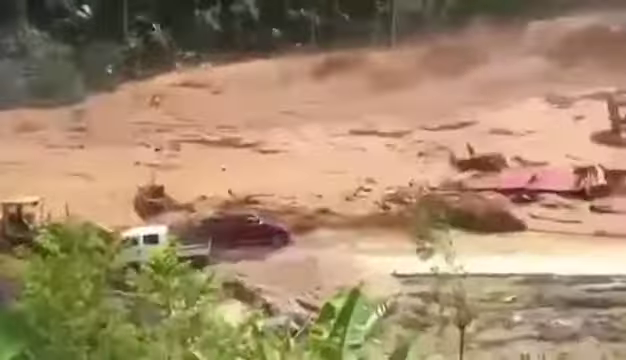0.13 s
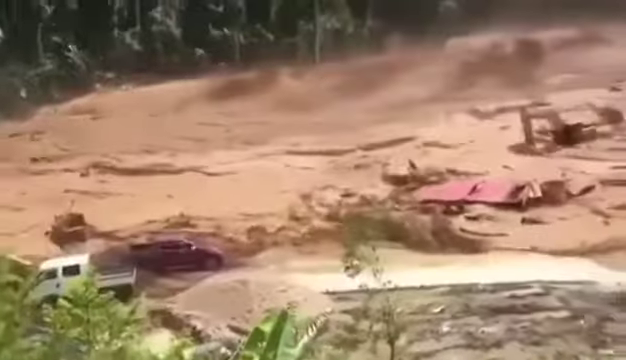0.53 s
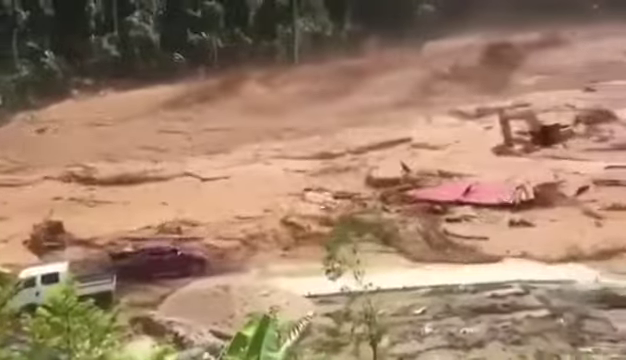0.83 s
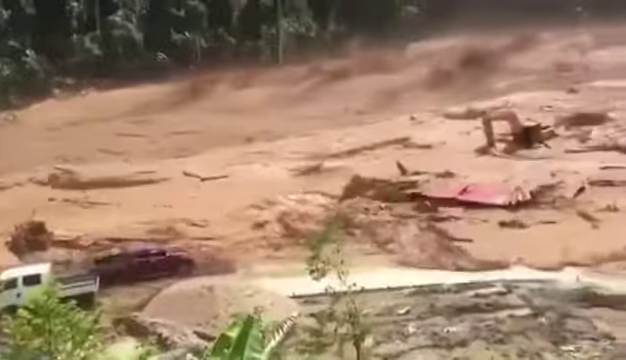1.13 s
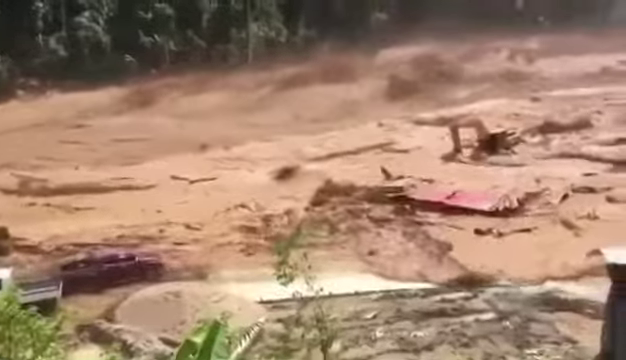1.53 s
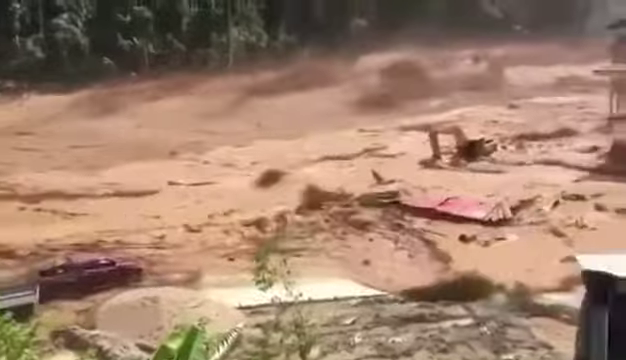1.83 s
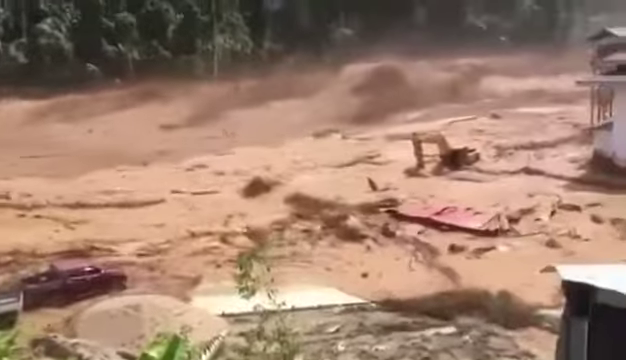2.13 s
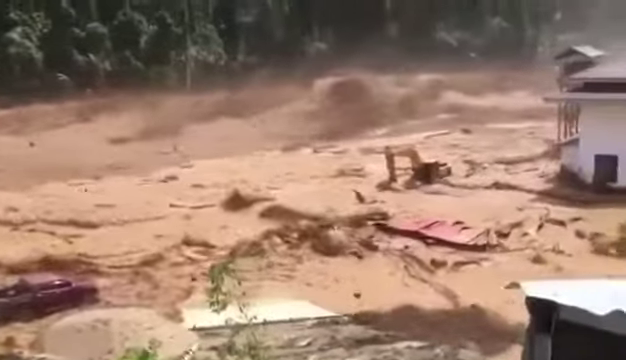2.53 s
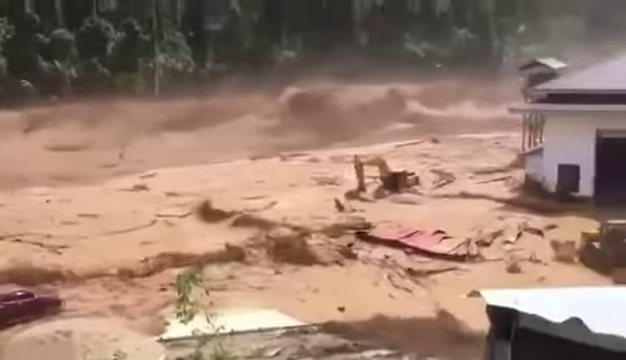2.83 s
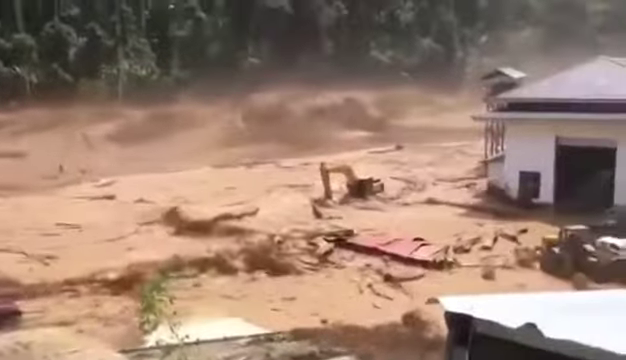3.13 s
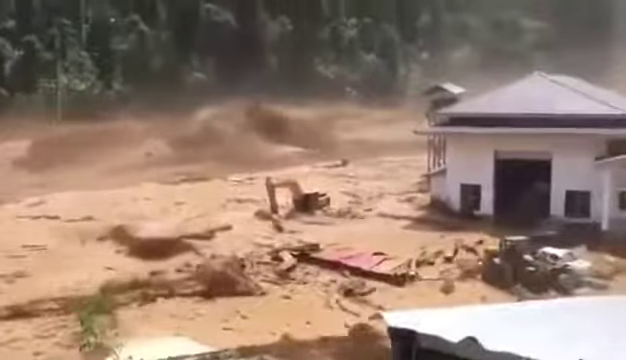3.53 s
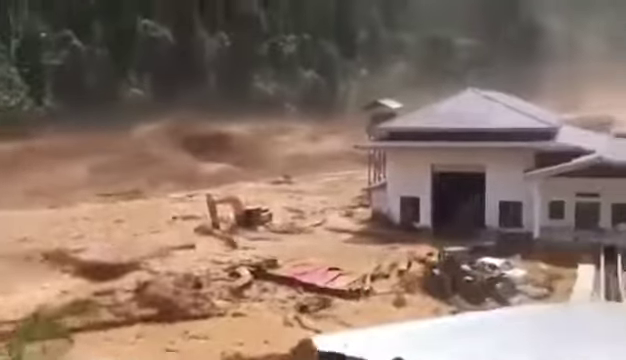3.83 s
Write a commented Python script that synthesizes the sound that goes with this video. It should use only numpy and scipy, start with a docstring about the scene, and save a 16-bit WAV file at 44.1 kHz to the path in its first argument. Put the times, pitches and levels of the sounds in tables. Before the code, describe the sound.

Floodwater rushes outdoors, soft at first, then a full continuous roar with deep rumble, bubbling and sharp splashes. High insect-like whistles pulse only at the start. The microphone overlooks it, with limited treble and slight overload on peaks.

```python
"""In a valley, heard from a slope above, a flood of mud and water roars; the sound fades in.
Rumble, roar, spray and fizz are bands of random noise, each with its own spectrum and level curve.
Heavy thuds are short low tones, breaking waves are short noise bursts, bubbles are brief rising tones.
Two thin, pulsing whistles, perhaps insects, are tones blended with narrow noise; they stop within a second.
"""
import sys
import numpy as np
from scipy import signal
from scipy.fft import rfft, irfft
from scipy.io import wavfile

SR = 44100
rng = np.random.default_rng(int(sys.argv[2]) if len(sys.argv) > 2 else 0)


def master_out(mix):
    """Clip the mix to full scale and print it as 16-bit PCM to the path in sys.argv[1]."""
    frames = np.transpose(np.atleast_2d(mix))
    ceiling = np.clip(frames, -1, 1)
    pcm = np.round(ceiling * 32767).astype(np.int16)
    wavfile.write(sys.argv[1], SR, pcm)


N = 175518
TIME = np.arange(N) / SR  # s


def amp(db):
    """Decibel definition: 20 dB is a factor of ten in amplitude."""
    return 10 ** (np.asarray(db) / 20)


def evened(x):
    """Normalisation to unit root-mean-square value."""
    return x / np.sqrt(np.mean(x ** 2) + 1e-20)


def bell(t, centre, width):
    """Gaussian pulse: falls to 1/e at one width from its centre."""
    return np.exp(-((t - centre) / width) ** 2)


def spectrum_db(points, hz):
    """Spectral density: interpolated on a logarithmic frequency axis, -100 dB outside the points."""
    f, db = np.transpose(points)
    return np.interp(np.log(hz + 1), np.log(f + 1), db, left=-100, right=-100)


def noise(shape_db, size, patch_db, patch_hz, patch_s):
    """Short-time Fourier synthesis: random spectra under shape_db(hz, t), with drifting patches."""
    hop = size // 4
    hz = np.fft.rfftfreq(size, 1 / SR)[:, None]
    t = np.arange(N // hop + 5) * hop / SR
    real, imaginary, grain = rng.standard_normal((3, len(hz), len(t)))
    # Gaussian smoothing makes neighbouring frequencies and moments rise and fall together
    steps = np.arange(-40, 41)
    across_hz = np.exp(-.5 * (steps / (patch_hz * size / SR)) ** 2)
    across_time = np.exp(-.5 * (steps / (patch_s * SR / hop)) ** 2)
    patches = evened(signal.fftconvolve(grain, np.outer(across_hz, across_time), "same"))
    spectra = (real + 1j * imaginary) * amp(shape_db(hz, t) + patch_db * patches)
    return signal.istft(spectra, nperseg=size, noverlap=size - hop)[1][:N]


def coloured_noise(colour, patch_db, patch_hz, patch_s):
    """Stationary spectrum: patchy noise whose average colour stays the same, at unit rms."""
    return evened(noise(lambda hz, t: spectrum_db(colour, hz), 2048, patch_db, patch_hz, patch_s))


# Changing strength of the flood:
# (time [s], rumble level [dB], roar level [dB], spray level [dB])
FLOOD_LEVELS = [(0, -27.5, -33.5, -35), (.17, -29, -33, -34.5), (.4, -23, -28.5, -29),
                (.55, -22.5, -26, -25.5), (.7, -20, -24, -23.5), (.9, -16.5, -21.5, -25),
                (1.15, -18.5, -19.5, -20.5), (1.35, -19, -23, -23), (1.56, -20.5, -21, -22.5),
                (1.7, -17, -22.5, -22), (1.95, -19, -20, -21), (2.2, -18.5, -21.5, -21.5),
                (2.42, -18, -22.5, -21.5), (2.65, -16, -23, -22), (2.87, -19, -22, -22.5),
                (3.1, -19, -21.5, -22.5), (3.3, -17, -21, -23.5), (3.45, -23, -21, -22),
                (3.62, -16, -22, -24), (3.8, -19.5, -20, -24.5), (3.98, -18, -23.5, -22.5)]


def flood_db(column):
    """Level envelope: linear interpolation in decibels of one column of the flood's strength."""
    rows = np.array(FLOOD_LEVELS)
    return np.interp(TIME, rows[:, 0], rows[:, column])


# Colour of the rumble: (frequency [Hz], relative density [dB per Hz])
RUMBLE_COLOUR = [(15, -42), (28, -20), (40, -5), (52, -3), (72, -5.5), (85, -2.5), (115, -1.5), (190, -6),
                 (231, -4), (302, -9), (420, -20), (550, -32.5), (920, -100)]


def rumble():
    """Low-frequency band noise: the deep part of the flood under its own envelope."""
    return amp(flood_db(1)) * coloured_noise(RUMBLE_COLOUR, patch_db=1.35, patch_hz=40.4, patch_s=0.038)


# Colour of the roar: (frequency [Hz], relative density [dB per Hz])
ROAR_COLOUR = [(180, -24), (300, -5.5), (380, -1), (481, -2.5), (629, 1.5), (775, -0.5), (1000, 0),
               (1190, -7), (1500, -5.5), (1950, -16.5), (3300, -120)]


def roar():
    """Broadband noise: the middle of the spectrum under its own envelope."""
    return amp(flood_db(2)) * coloured_noise(ROAR_COLOUR, patch_db=2.5, patch_hz=26, patch_s=0.021)


# Colour of the spray: (frequency [Hz], relative density [dB per Hz])
SPRAY_COLOUR = [(710, -18), (1200, -3.5), (1890, -1), (2400, -1), (3110, -3), (3500, -5.5), (4200, -9),
                (6000, -59)]


def spray():
    """High-frequency band noise: the hiss of spray under its own envelope."""
    return amp(flood_db(3)) * coloured_noise(SPRAY_COLOUR, patch_db=3.0, patch_hz=26.4, patch_s=0.024)


# Strength of the fizz before its flicker: (time [s], level [dB])
FIZZ_LEVELS = [(0, -44.5), (.15, -42), (.4, -37), (.6, -33), (.9, -29.5), (1.1, -28), (1.35, -27.5),
               (1.65, -28), (1.85, -27), (2.15, -27.5), (2.4, -23.5), (2.6, -27), (2.7, -26), (3.0, -28.5),
               (3.4, -27), (3.7, -28), (3.98, -29)]
# Colour of the fizz: (frequency [Hz], relative density [dB per Hz])
FIZZ_COLOUR = [(2500, -43), (3400, -5), (4100, -1.5), (4850, -2.5), (5650, -2.5), (7600, -7), (8500, -9.5),
               (9200, -7.5), (10000, -10.5), (10400, -23.5), (10800, -48)]
GUST_DB, GUST_HZ = 0.78, (5.0, 19)  # rms depth of the flicker; range of its rates


def fizz():
    """Amplitude modulation: treble noise flickers at many rates as sheets of spray land."""
    rates = np.geomspace(*GUST_HZ, num=20)
    gust = evened(sum(np.sin(2 * np.pi * (f * TIME + rng.random())) for f in rates))
    level = np.interp(TIME, *np.transpose(FIZZ_LEVELS)) + GUST_DB * gust
    return amp(level) * coloured_noise(FIZZ_COLOUR, patch_db=3.0, patch_hz=26.1, patch_s=0.02)


# Heavy thuds in the rumble:
# (time [s], 1/e half-width [s], peak level [dB], pitch [Hz])
THUDS = [(.36, 0.014, -24, 130), (.58, 0.019, -16, 113), (.585, 0.016, -19.5, 307),
         (0.731, 0.017, -22, 266), (0.749, 0.022, -13, 132), (.9, .03, -23.5, 361), (.94, .015, -18, 223),
         (1.009, 0.014, -11.5, 96), (1.191, 0.015, -14.5, 143), (1.22, 0.035, -17.5, 264.6),
         (1.39, 0.023, -14.5, 119), (1.475, 0.021, -20, 366), (1.513, 0.0063, -9.5, 120),
         (1.6, 0.0094, -11.5, 117), (1.8, 0.023, -13, 148), (2.258, 0.018, -17.5, 122),
         (2.51, 0.0095, -9.5, 140), (2.71, 0.011, -12, 130), (2.93, 0.012, -8.5, 108),
         (3.14, 0.025, -14, 232), (3.37, 0.016, -16.5, 142), (3.744, .015, -14, 93)]


def thuds():
    """Gaussian tone burst: each thud is a low tone that swells and dies within a short time."""
    out = np.zeros(N)
    for s, width, db, hz in THUDS:
        tone = np.sin(2 * np.pi * (hz * (TIME - s) + rng.random()))
        out += amp(db) * bell(TIME, s, width) * tone
    return out


# Breaking waves: (time [s], 1/e half-width of power [s], nominal peak level [dB],
# centre frequency [Hz], spectral standard deviation [octaves])
SPLASHES = [(1.09, 0.011, -30, 4000, 0.53), (1.15, 0.11, -26, 1010, 0.53), (1.2, 0.027, -39, 4000, 1.1),
            (1.535, 0.023, -24, 5430, 0.41), (1.76, 0.02, -31, 5500, 0.25), (2.05, 0.021, -26, 5000, 0.5),
            (2.36, 0.038, -27, 5400, 0.49), (2.5, 0.028, -26, 2770, 0.083), (3.58, 0.04, -27.5, 3270, 0.11)]


def splashes():
    """Addition of powers: each breaking wave adds a noise burst spread around its centre frequency."""
    def shape_db(hz, t):
        power = 1e-12
        for s, width, db, centre_hz, octaves in SPLASHES:
            distance = np.log2((hz + 1) / centre_hz) / octaves
            colour = np.exp(-.5 * distance ** 2) / (hz + 1)
            power = power + amp(2 * db) * colour / colour.sum() * bell(t, s, width)
        return 10 * np.log10(power)
    return noise(shape_db, size=256, patch_db=2.5, patch_hz=300, patch_s=0.019)


BUBBLE_HZ, BUBBLE_PITCHES = (350.7, 9990), 90  # range of starting pitches; number of them
BUBBLE_DB = -4.5  # level against the spray's
BUBBLES_PER_S, BUBBLE_S = 900, 0.038  # mean rate over all pitches; length of one bubble
BUBBLE_RISE = 0.0097  # the pitch rises by twice this fraction


def bubbles():
    """Resonance of trapped air: short rising tones at random times, fainter away from 1 kHz."""
    out = np.zeros(N)
    t = np.arange(0, BUBBLE_S, 1 / SR)
    for hz in np.geomspace(*BUBBLE_HZ, num=BUBBLE_PITCHES):
        swell = np.sin(np.pi * t / BUBBLE_S)
        tone = swell * np.sin(2 * np.pi * hz * t * (1 + BUBBLE_RISE * t / BUBBLE_S))
        starts = rng.random(N) < BUBBLES_PER_S / BUBBLE_PITCHES / SR
        train = starts * amp(2.7 * rng.standard_normal(N))  # bubbles differ in strength
        pitch_db = -1.2 * np.log2(hz / 1000) ** 2
        out += amp(pitch_db) * signal.oaconvolve(train, tone)[:N]
    return evened(out) * amp(BUBBLE_DB + flood_db(3))


# Steady part of the whistles, which stop at the last row:
# (time [s], lower whistle level [dB], upper whistle level [dB])
WHISTLE_LEVELS = [(0, -43, -40), (.12, -54, -51), (.24, -46, -43), (.3, -40, -38), (.52, -47, -39),
                  (.72, -44, -42), (.81, -38, -38), (.85, -60, -55)]
# Purity of the lower, then the upper whistle:
# (noise width at half amplitude [Hz], peak of the pure tone against the noise rms [ratio])
WHISTLE_SHAPE = [(25, 4), (70, 1.6)]
# Pulses of the lower, then the upper whistle:
# (time [s], 1/e half-width [s], peak rms level of the pulse alone [dB])
WHISTLE_PULSES = [
    [(.185, .02, -44), (.27, .02, -35), (.375, .01, -32), (.43, .025, -33), (.495, .015, -30),
     (.575, .014, -32), (.61, .01, -32), (.655, .024, -29), (.785, .025, -28.5)],
    [(.09, .015, -41), (.15, .012, -40), (.23, .012, -40), (.37, .02, -31), (.435, .018, -32),
     (.56, .025, -34), (.645, .015, -33), (.71, .025, -30), (.795, .022, -32)],
]
WHISTLE_HZ = 2794, 3165  # lower, upper


def whistles():
    """Narrowband noise: each whistle blends a tone with noise around it, swelling into short pulses."""
    hz = np.fft.rfftfreq(N, 1 / SR)
    rows = np.array(WHISTLE_LEVELS)
    out = np.zeros(N)
    for k, (centre_hz, (width, pure)) in enumerate(zip(WHISTLE_HZ, WHISTLE_SHAPE)):
        band = rfft(rng.standard_normal(N)) / (1 + ((hz - centre_hz) / width * 2) ** 2)
        pure_tone = pure * np.sin(2 * np.pi * centre_hz * TIME)
        tone = evened(evened(irfft(band, N)) + pure_tone)
        steady = amp(np.interp(TIME, rows[:, 0], rows[:, k + 1]))
        pulses = sum(amp(db) * bell(TIME, s, length) for s, length, db in WHISTLE_PULSES[k])
        out += np.hypot(steady, pulses) * tone * (TIME < rows[-1, 0])
    return out


def scene():
    """Superposition: the pressures of all sources add."""
    water = rumble() + roar() + spray() + fizz()
    return (water + thuds() + splashes() + bubbles() + whistles())[None]


LOW_CUT_HZ, EDGE_HZ = 36, 10600  # edge of the low cut; upper limit of the microphone's band
CEILING = .98  # amplitude that the soft overload approaches


def record(dry):
    """Band limitation and saturation: low cut, soft overload on the tallest peaks, treble cut."""
    low_cut = signal.butter(3, LOW_CUT_HZ, "high", fs=SR, output="sos")
    x = signal.sosfilt(low_cut, dry)
    x = x / (1 + (x / CEILING) ** 10) ** .1
    treble_cut = signal.firwin(1023, EDGE_HZ, window=("kaiser", 10), fs=SR)
    return signal.oaconvolve(x, treble_cut[None], "same")


dry = scene()
out = record(dry)
master_out(out)
```